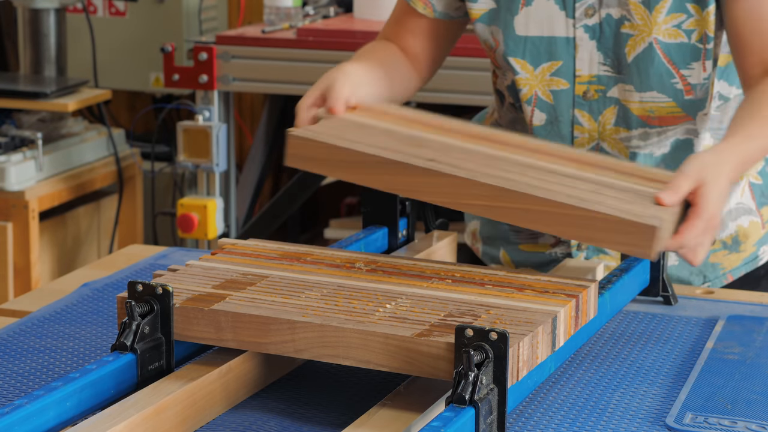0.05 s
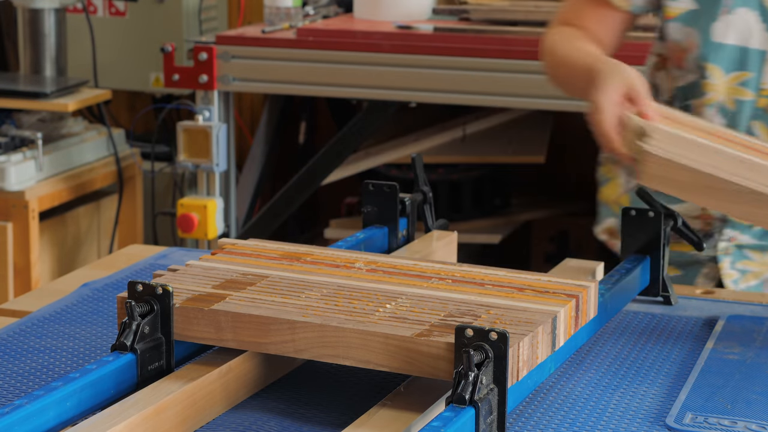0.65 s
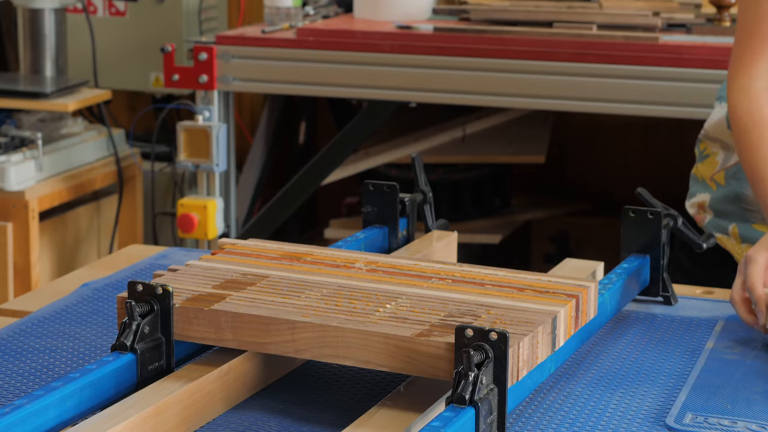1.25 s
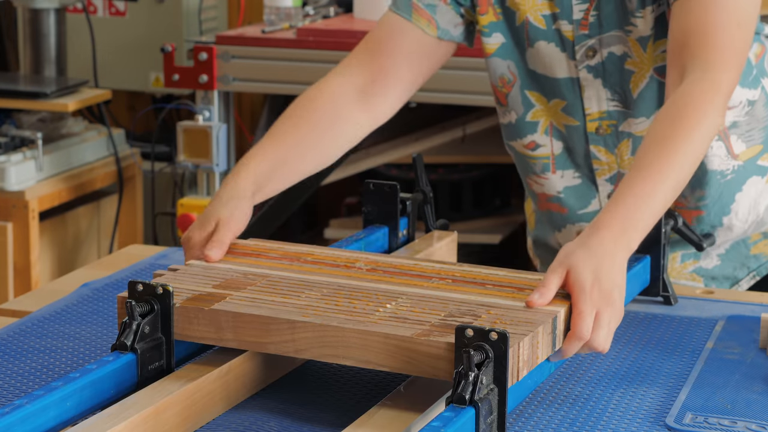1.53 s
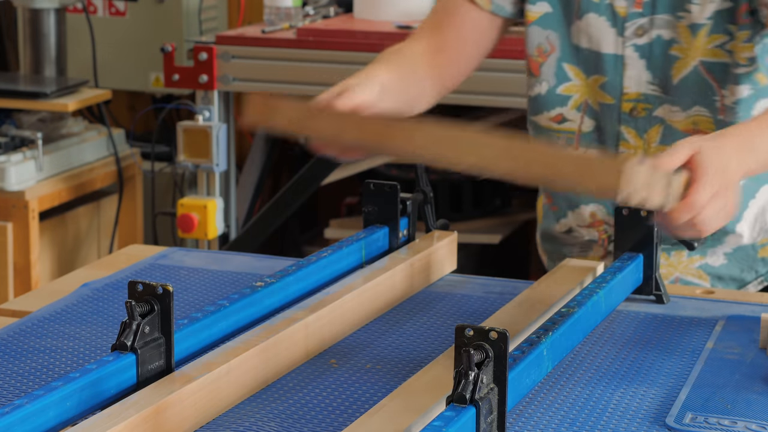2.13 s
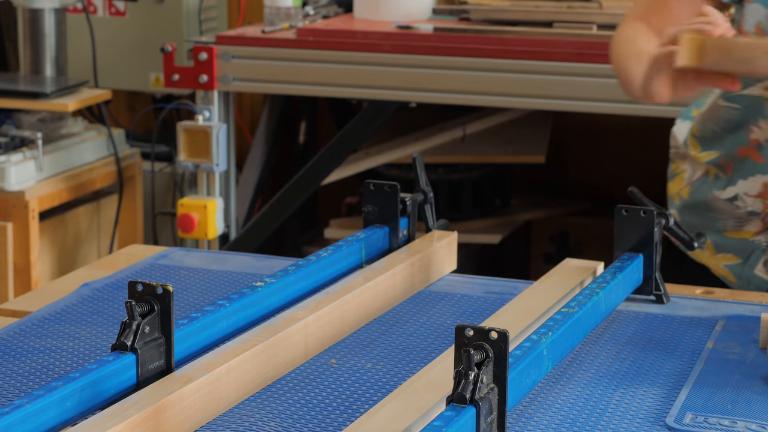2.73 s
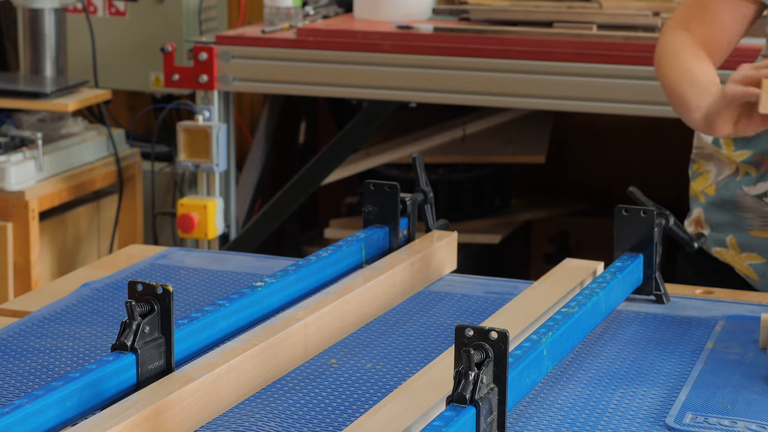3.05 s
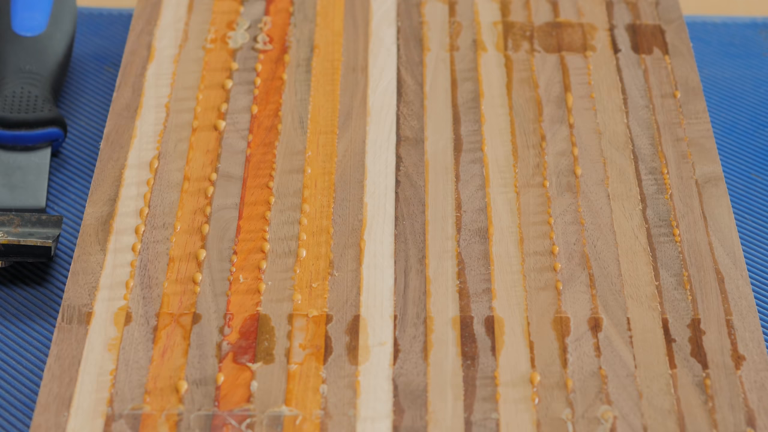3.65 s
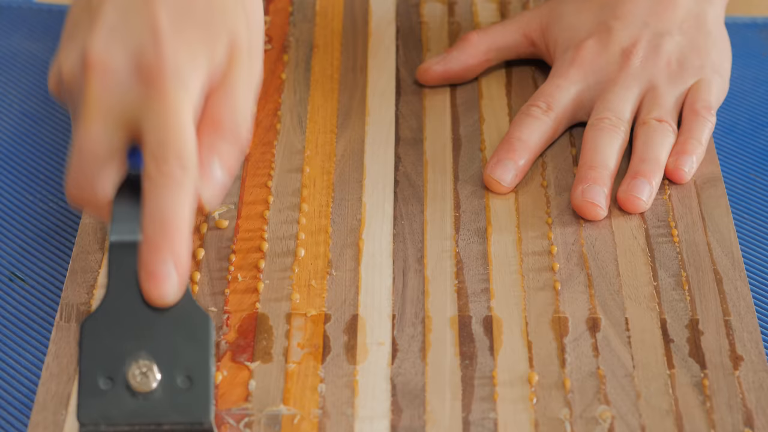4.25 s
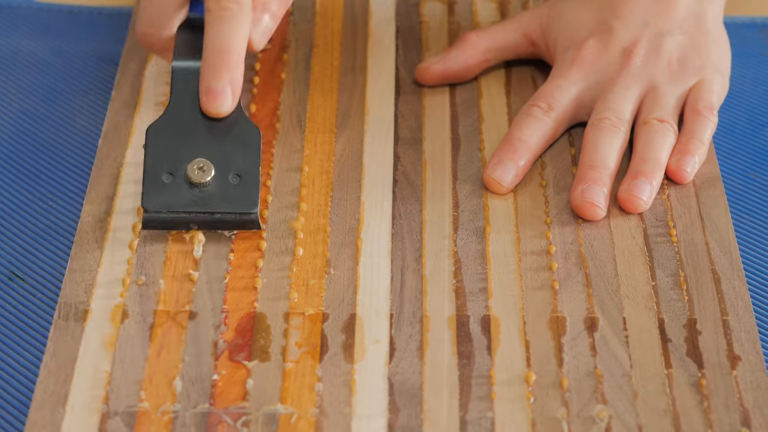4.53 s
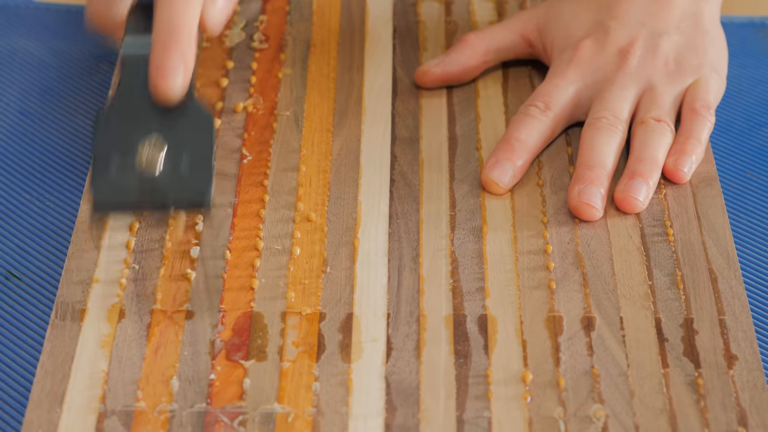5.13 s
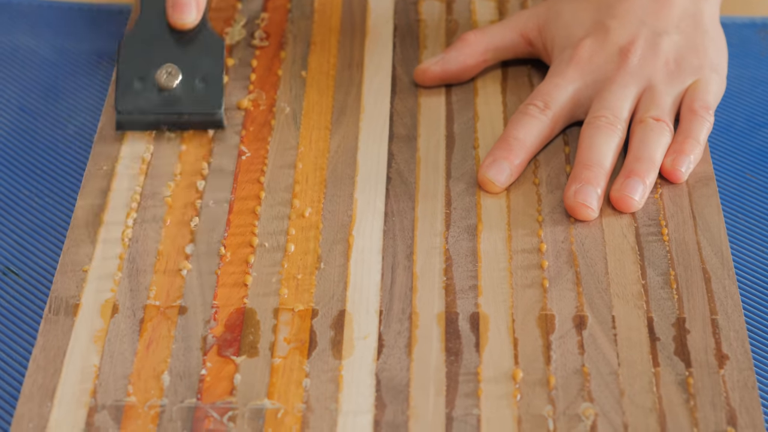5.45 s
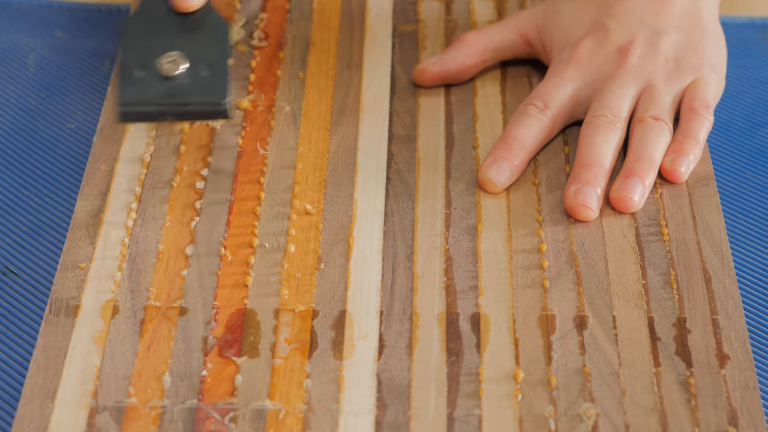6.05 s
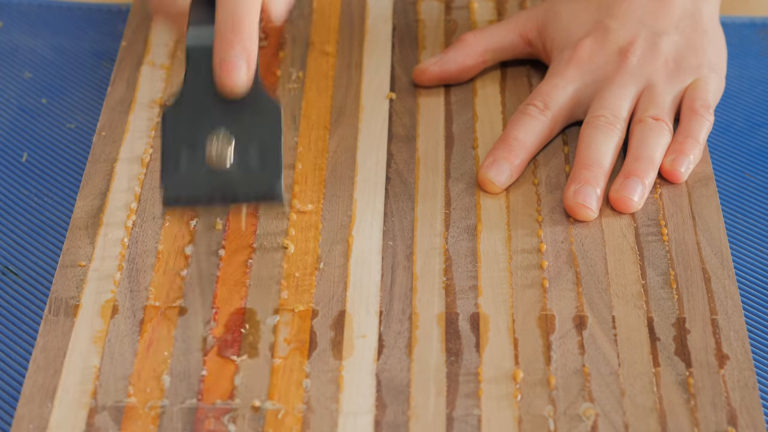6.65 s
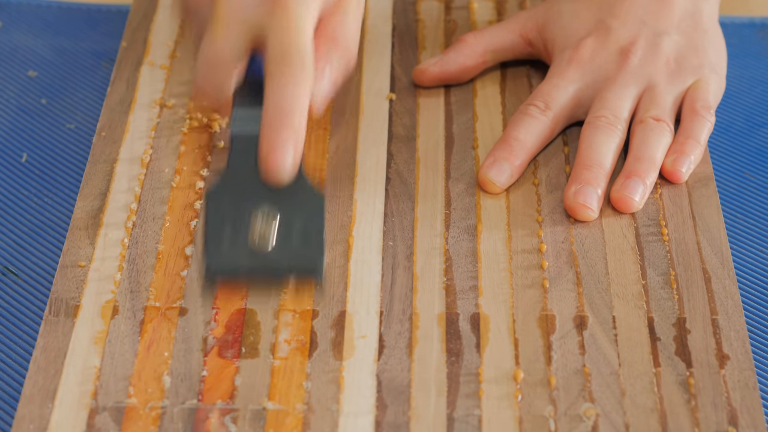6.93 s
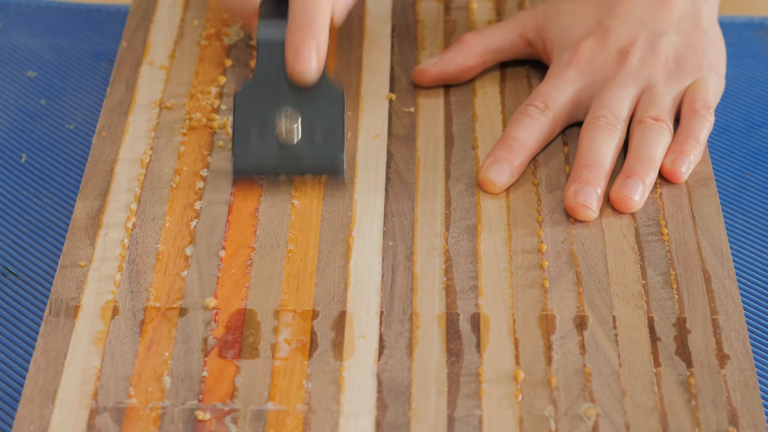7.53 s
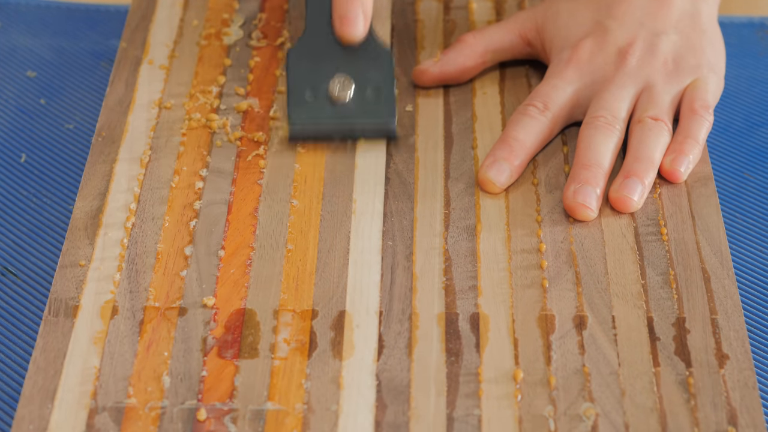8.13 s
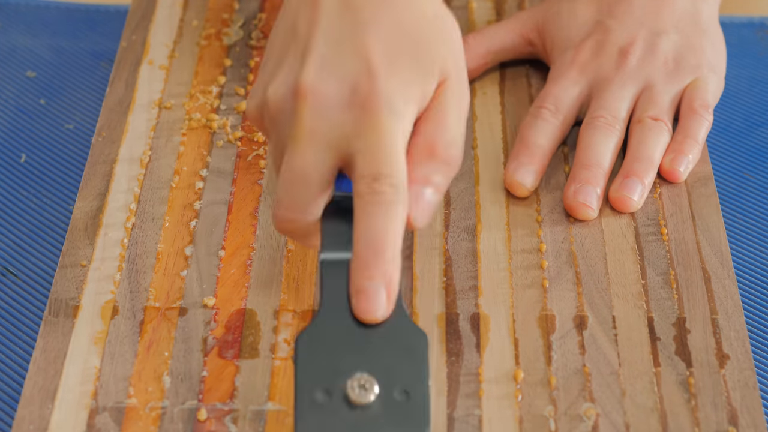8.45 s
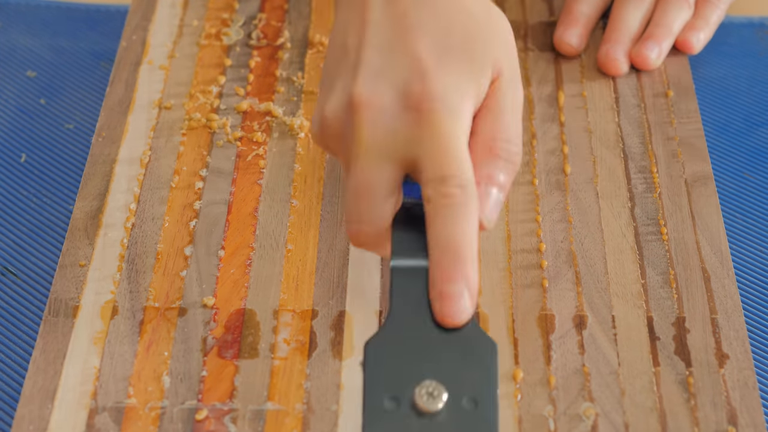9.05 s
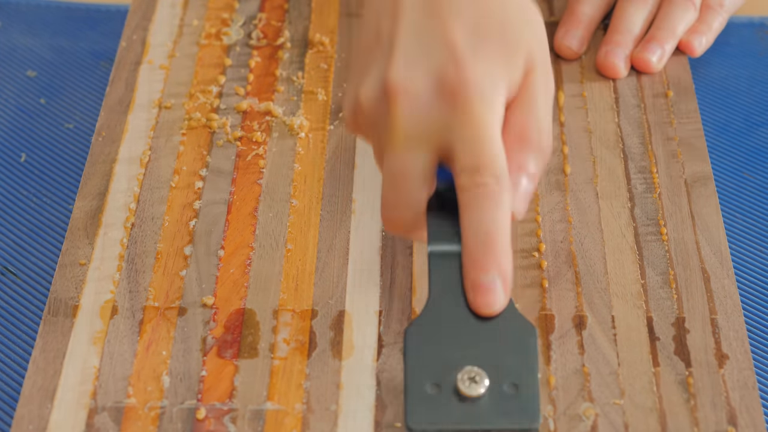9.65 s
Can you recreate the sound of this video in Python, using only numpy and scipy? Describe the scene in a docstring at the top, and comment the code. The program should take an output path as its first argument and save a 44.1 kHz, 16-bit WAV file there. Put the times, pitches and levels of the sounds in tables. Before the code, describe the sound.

In a quiet workshop, a glued wooden board is lifted from its clamps with soft shuffling, a few light knocks and low bumps over a faint machine whine. After about four seconds a steel hand scraper knocks down on the board close to the microphone and makes eleven even pulls. The blade rasps, crackles and chatters, snapping off beads of dried glue, and the strokes grow louder as the wood rings beneath.

```python
"""Light knocks and shuffling over a faint whine: in a workshop a glued-up board is lifted from its clamps.
Then a hand scraper knocks down on it and makes eleven pulls. The steel edge catches and slips in
dried glue, crackling, chattering and snapping off beads; the board rings under it and the bench
rumbles. The loudest peaks overload."""
import sys
import numpy as np
from scipy import signal
from scipy.io import wavfile
from scipy.ndimage import uniform_filter1d

SR = 44100
rng = np.random.default_rng(int(sys.argv[2]) if len(sys.argv) > 2 else 0)


def persist_wave(psi):
    """Save psi, clipped to +-1, as 16-bit WAV."""
    counts = np.round(np.clip(psi, -1, 1) * 32767).astype(np.int16)
    wavfile.write(sys.argv[1], SR, np.atleast_2d(counts).T)


N = 435840
TIME = np.arange(N) / SR


def gain_of(db):
    return np.exp(np.asarray(db) * np.log(10) / 20)


def unit_rms(x):
    return x / np.sqrt(np.mean(x ** 2) + 1e-20)


def unit_energy(x):
    return x / np.linalg.norm(x)


def curve_at(points, hz):
    point_hz, value = np.transpose(points)
    return np.interp(np.log(hz + 1), np.log(point_hz + 1), value)


def add(mix, start_s, sound):
    part = mix[round(start_s * SR):][:len(sound)]
    part += sound[:len(part)]


def through(x, response):
    return signal.oaconvolve(x, response)[:len(x)]


def tone(hz):
    return np.sin(2 * np.pi * np.cumsum(hz) / SR)


def colour(spectrum, peaks=(), size=4096):
    """Causal response of energy 1 from a spectrum (Hz, dB) and peaks (Hz, half-width Hz, dB)."""
    hz = abs(np.fft.fftfreq(size, 1 / SR))
    power = gain_of(curve_at(spectrum, hz)) ** 2
    for centre, width, db in peaks:
        power += (gain_of(db) / (1 + ((hz - centre) / width) ** 2)) ** 2
    log_gain = np.log(power + 1e-10) / 2
    minimum_phase = np.exp(np.conj(signal.hilbert(log_gain)))
    return unit_energy(np.fft.ifft(minimum_phase).real[:size // 2])


def resonate(x, hz, width_hz):
    """A resonance that follows the curve hz; output rms 1."""
    turn = np.exp(2j * np.pi * np.cumsum(hz) / SR)
    r = np.exp(-np.pi * width_hz / SR)
    return unit_rms((turn * signal.lfilter([(1 - r) ** 2], [1, -2 * r, r * r], x / turn)).real)


def puff(rise_s, decay_s, size):
    t = np.arange(size) / SR
    return (1 - np.exp(-(t / rise_s) ** 2)) * np.exp(-t / decay_s)


def burst(rise_s, decay_s, size=4096):
    """A puff of noise, about rms 1 at its top."""
    shape = puff(rise_s, decay_s, size)
    return rng.standard_normal(size) * shape / shape.max()


def swell(t, length_s, rise_s, depth_db, release_db_per_s):
    """Gain that rises, holds until length_s, then dies."""
    db = -depth_db * np.clip(1 - t / rise_s, 0, 1) - release_db_per_s * np.maximum(t - length_s, 0)
    return np.clip(t / .01, 0, 1) * gain_of(db)


def wander(seconds):
    """Smooth random drift of rms 1."""
    return unit_rms(through(rng.standard_normal(N), np.hanning(max(int(seconds * SR), 3))))


def grains(per_s, spread_db):
    """Tiny fractures: random clicks, a few of them large."""
    sizes = gain_of(spread_db * np.minimum(rng.exponential(1, N), 4))
    return unit_rms(sizes * rng.choice([-1., 1.], N) * (rng.random(N) < per_s / SR))


# Room noise and hiss spectra. Each row: frequency in Hz, density in dB.
AIR_SPECTRUM = [(25, -8), (45, 1), (70, -5.5), (200, -4), (400, -9), (700, -15.5), (1200, -19.5),
                (3000, -23.5), (16000, -36)]
HISS_SPECTRUM = [(200, 3.5), (1000, 5), (3000, 8), (6000, 0), (10000, -12), (16000, -32)]


def background(hiss_from_s=3.32, hiss_to_s=4.33, hum_start_s=.56, hum_hz=59.5,
               whine_end_s=3.32, whine_hz=947):
    """Low room noise, a spell of soft hiss, a passing hum and a thin machine whine."""
    spell = uniform_filter1d(1. * ((TIME > hiss_from_s) & (TIME < hiss_to_s)), SR // 50)
    air_db = np.where(TIME < hiss_to_s, -63.5, -65) + 3 * spell + .8 * wander(.2)
    air = gain_of(air_db) * through(rng.standard_normal(N), colour(AIR_SPECTRUM))
    hiss = gain_of(-71) * spell * through(rng.standard_normal(N), colour(HISS_SPECTRUM))
    hum_shape = swell(TIME - hum_start_s, length_s=.6, rise_s=.1, depth_db=18, release_db_per_s=8.1)
    hum = gain_of(-63.5) * hum_shape * unit_rms(tone(hum_hz + 3 * wander(.22)))
    whine = gain_of(-73 + wander(.16)) * unit_rms(tone(whine_hz + 3 * wander(.15)))
    return air + hiss + hum + whine * (TIME < whine_end_s)


# Room decay. Each row: frequency in Hz, T60 in seconds.
ROOM_T60 = [(100, 0.1), (700, 0.14), (2000, 0.16), (5000, 0.16), (10000, 0.26), (16000, 0.024)]


def reverb(x, first_s=.0069, taps_per_s=3000):
    """Sparse workshop reflections, each band dying at its own rate."""
    size = SR // 2
    taps = rng.choice([-1., 1.], size) * (rng.random(size) < taps_per_s / SR) * (TIME[:size] > first_s)
    hz, t, bands = signal.stft(taps, SR, nperseg=256)
    decay = gain_of(-60 * t / curve_at(ROOM_T60, hz)[:, None])
    tail = signal.istft(bands * decay, SR, nperseg=256)[1]
    return through(x, unit_energy(tail))


def squeak(start_s=.061, length_s=.11, level_db=-59, pitch_hz=1400, wobble_hz=45):
    """Wood slips in the hands: a short, unsteady tone."""
    out, size = np.zeros(N), int(length_s * SR)
    hz = pitch_hz + wobble_hz * wander(.0045)[:size]
    add(out, start_s, gain_of(level_db) * np.hanning(size) * tone(hz))
    return out


# Each row: frequency in Hz, density in dB.
SWISH_SPECTRUM = [(88, -44), (150, -11), (232, -0.5), (496, -4.5), (928, -19), (1080, -17), (1840, -21),
                  (5020, -8.5), (5740, -16.5), (14000, -50)]


def swish(start_s=3.315, length_s=.13, level_db=-54.5):
    """One smooth swish of noise."""
    out = np.zeros(N)
    noise = through(rng.standard_normal(SR), colour(SWISH_SPECTRUM))[:int(length_s * SR)]
    add(out, start_s, gain_of(level_db) * noise * signal.windows.tukey(len(noise), .3))
    return out


# Each row: start in seconds, length in seconds, body level in dB, centre in Hz, hiss level in dB.
RUB_EVENTS = [(0.062, 0.1, -63.5, 1170, -65), (0.522, 0.043, -66, 400, -67.5), (0.79, .14, -59.5, 450, -63),
              (0.954, .19, -54.5, 755, -55.5), (1.33, .10, -66, 1010, -69), (1.678, 0.069, -58, 13300, -56),
              (1.812, 0.2, -80, 2300, -71), (2.558, 0.74, -73.5, 1000, -71),
              (2.759, 0.049, -56.5, 970, -69), (2.972, 0.12, -60.5, 640, -65),
              (4.041, 0.036, -70, 700, -55), (8.951, 0.017, -62.5, 1200, -56.5)]


def rubs():
    """Hands, wood and tool brush and slide: a band of grit plus hiss."""
    out = np.zeros(N)
    grit = grains(per_s=2200, spread_db=5)
    hiss = through(grains(per_s=11000, spread_db=5), colour(HISS_SPECTRUM))
    for start_s, length_s, db, hz, hiss_db in RUB_EVENTS:
        span = slice(int(start_s * SR), int((start_s + length_s) * SR))
        band = colour([(100, -22), (16000, -60.5)], [(hz, 200 + .13 * hz, 0)])
        rub = gain_of(db) * unit_rms(through(grit[span], band)) + gain_of(hiss_db) * hiss[span]
        add(out, start_s, rub * signal.windows.tukey(len(rub), .6))
    return out


# Wood knock and bench spectra. Each row: frequency in Hz, density in dB.
KNOCK_SPECTRUM = [(100, -46), (400, -7), (600, 2.5), (1000, 3), (2400, 6.5), (3500, 0.5), (6000, -4),
                  (9000, -12.5), (16000, -25)]
BENCH_SPECTRUM = [(25, -42.5), (55, -8), (90, -2.5), (130, 6), (175, -9.5), (250, -9.5), (450, -12),
                  (700, -34.5), (2000, -75)]
# Clamp bar modes. Each row: frequency in Hz, level in dB, T60 in seconds.
CLAMP_MODES = [(2180, -14, .33), (2570, -8.5, 0.42), (2730, -5, 0.38), (3046, 0, 0.5), (3490, -15, 0.84),
               (4260, -10.5, 0.58), (4398, -14, 0.33), (5830, -7, 0.3)]
# Each row: start in seconds, level in dB, clamp ring in dB relative to the knock.
KNOCK_EVENTS = [(0.297, -65, -0.5), (1.26, -67, -17), (1.588, -58.5, -13), (1.649, -51, -25),
                (1.779, -39.5, -20), (1.801, -48, -23), (1.853, -48, -10.5), (2.151, -80, -4),
                (2.331, -71, -7.5)]
# Each row: start in seconds, level in dB.
BUMP_EVENTS = [(1.397, -21), (3.925, -24.5), (7.908, -29), (8.459, -24.5)]


def knocks(tick_db=-34):
    """Wood knocks ring the clamp bar; soft bumps shake the bench with a faint tick."""
    out, t = np.zeros(N), TIME[:SR]
    wood = colour(KNOCK_SPECTRUM, [(2200, 390, 4), (2700, 100, 3.5)])
    bench = colour(BENCH_SPECTRUM, [(400, 230, -7), (2500, 2800, -29.5)])
    clamp = sum(gain_of(db - 60 * t / t60) * np.sin(2 * np.pi * hz * t) for hz, db, t60 in CLAMP_MODES)
    for start_s, db, ring_db in KNOCK_EVENTS:
        add(out, start_s, gain_of(db) * through(burst(rise_s=.0042, decay_s=.0092), wood))
        add(out, start_s, gain_of(db + ring_db) * clamp)
    for start_s, db in BUMP_EVENTS:
        add(out, start_s, gain_of(db) * bench)
        add(out, start_s, gain_of(db + tick_db) * through(burst(rise_s=.0017, decay_s=.0025), wood))
    return out


# Board resonances. Each row: frequency in Hz, half-width in Hz, level in dB.
BOARD_MODES = [(714, 16, -0.5), (767.3, 25, -1.5), (859, 20, -7), (1063, 39, -1.5), (1131.6, 23, 3.5),
               (1390, 21, -15), (2063, 79, -10.5), (2100, 92, -20), (2630, 80, -16.5)]
# The board between its resonances. Each row: frequency in Hz, level in dB.
BOARD_SPECTRUM = [(100, -38.5), (600, -26.5), (690, -20), (950, -13), (1230, -6.5), (1600, -27.5),
                  (4000, -31), (16000, -58)]


def board(low_db=0, damping=1, scatter_db=2.05):
    """The board's ring; where the blow falls sets each mode's share, above all the lowest."""
    modes = [(hz, width * damping, db + scatter_db * rng.standard_normal() + low_db * (hz < 900))
             for hz, width, db in BOARD_MODES]
    return colour(BOARD_SPECTRUM, modes, size=8192)


# Scraper resonances. Each row: frequency in Hz, half-width in Hz, level in dB.
BLADE_MODES = [(1986, 140, 0), (2590, 49, -8), (3250, 170, -18), (3430, 200, 2), (3580, 250, -4),
               (4270, 74, -0.5), (5330, 22, -11.5), (6150, 150, -8), (8340, 150, -16.5), (11500, 140, -15),
               (12400, 50, -14), (15500, 290, -18)]
# Crackle at the edge. Each row: frequency in Hz, density in dB.
CRACKLE_SPECTRUM = [(60, -33.5), (250, -24.5), (450, -15), (600, -20.5), (1400, -9), (2400, -16.5),
                    (4500, -9), (7000, -21.5), (9500, -27.5), (14000, -27), (16000, -31.5)]


def blade(detune=.016):
    """The scraper's ring, slightly detuned by each new grip."""
    modes = [(hz * (1 + detune * rng.standard_normal()), width, db) for hz, width, db in BLADE_MODES]
    return colour(CRACKLE_SPECTRUM, modes)


# Each row: start in seconds, level in dB.
GRAZE_EVENTS = [(4.631, -35), (6.796, -52.5), (6.886, -44.5), (7.361, -48.5), (7.765, -51.5), (8.876, -47),
                (9.528, -53.5)]


def grazes():
    """Light, dull touches of the blade on the board between pulls."""
    out = np.zeros(N)
    for start_s, db in GRAZE_EVENTS:
        add(out, start_s, gain_of(db) * burst(rise_s=.0049, decay_s=.0093))
    return through(out, board(low_db=-3, damping=2.9))


# Each row: start in seconds, blow in dB, edge click in dB, lift of the low board modes in dB.
LANDING_EVENTS = [(4.3675, -6.5, -25, -18.5), (4.838, -10, -16, -2.5), (5.2959, -22, -30.5, 2.5),
                  (5.803, -24.5, -29.5, 0), (6.3549, -23, -30, 10.5), (7.430, -15.5, -29.5, 5),
                  (7.998, -6, -18.5, 3), (8.537, 3, -16, 0), (9.135, -3, -25.5, 2),
                  (9.7572, -3.5, -25.5, 7)]


def landings(contact_s=.00017, delay_s=.00097):
    """The edge clicks, then the tool's weight rings the board and nudges the bench; hard blows thud."""
    out, t = np.zeros(N), TIME[:256]
    blow = t * np.exp(-2 * t / contact_s)
    steel = colour(CRACKLE_SPECTRUM, [(2300, 1200, -2), (4840, 1800, -10.5)])
    bench = colour(BENCH_SPECTRUM)
    thud = colour([(30, -44.5), (200, -24), (2000, -70.5)], [(232.2, 35, 0)])
    for start_s, db, click_db, low_db in LANDING_EVENTS:
        wood = through(board(low_db, damping=1.6), blow)
        add(out, start_s, gain_of(click_db) * through(burst(rise_s=.0027, decay_s=.0024), steel))
        add(out, start_s + delay_s, gain_of(db) * wood / abs(wood).max())
        add(out, start_s + delay_s, gain_of(-6 + .048 * db) * bench + gain_of(db - 14) * thud)
    return out


def small_beads(per_pull=8, level_db=-26.5, firm_bite_db=-28):
    """Rows like BIG_BEADS, at random along each pull; louder under a harder bite."""
    rows = []
    for start_s, length_s, bite_db, _ in PULL_EVENTS:
        for k in range(per_pull):
            along = (k + 2 + rng.random()) / (per_pull + 1)
            db = level_db + .16 * (bite_db - firm_bite_db) + rng.standard_normal()
            hz = CHATTER_HZ + CHATTER_DRIFT_HZ * rng.standard_normal()
            rows.append((start_s + along * length_s, db, hz))
    return rows


# Big glue beads. Each row: time of the snap in seconds, level in dB, blade chatter in Hz.
BIG_BEADS = [(4.438, -23, 3300), (4.462, -26, 3080), (4.534, -21.5, 2660), (4.555, -22, 2970),
             (4.929, -18.5, 3930), (4.95, -18, 3320), (5.011, -20, 2630), (5.37, -25.5, 3050),
             (5.397, -20.5, 3045), (5.467, -19, 3490), (5.503, -18, 3340), (5.569, -29, 3200),
             (5.901, -21, 3220), (5.918, -21, 2970), (5.981, -20, 3650), (6.029, -16.5, 3338),
             (6.423, -28, 3500), (6.515, -15.5, 3740), (6.552, -15.5, 4100), (6.6, -20.5, 2870),
             (6.952, -16, 3570), (7.082, -14.5, 3380), (7.109, -20, 3620), (7.143, -11, 2810),
             (7.166, -19.5, 2630), (7.59, -11, 3764), (7.687, -24, 3410), (8.06, -15, 3710),
             (8.082, -13.5, 3575), (8.658, -20, 3540), (8.693, -15.5, 3730), (8.821, -25, 3100),
             (9.243, -20.5, 3400), (9.262, -14, 3354), (9.313, -11.5, 2770), (9.441, -16.5, 3350),
             (9.856, -17.5, 3200)]


def bead_snaps(rise_s=.0019, decay_s=.0019, chirp_db=-1, board_db=-7, bench_db=-23):
    """Each bead breaks in milliseconds; the blade chirps, and board and bench get a kick."""
    snaps, t = np.zeros(N), TIME[:600]
    shape = puff(rise_s, decay_s, len(t))
    shape_norm = np.linalg.norm(shape / shape.max())
    peaks = [(2203, 170, 1), (3780, 430, -1), (5400, 1400, -11), (13360, 500, -22.5)]
    steel = colour(CRACKLE_SPECTRUM, peaks)
    for snap_s, db, hz in list(BIG_BEADS) + small_beads():
        crack = unit_rms(through(rng.standard_normal(len(t)), steel))
        phase_drift = .11 * np.cumsum(rng.standard_normal(len(t)))
        chirp = gain_of(chirp_db) * np.sin(2 * np.pi * hz * t + phase_drift)
        add(snaps, snap_s - rise_s, gain_of(db) * shape_norm * unit_energy(shape * (crack + chirp)))
    kicks = abs(snaps) * rng.standard_normal(N)
    wood = gain_of(board_db) * through(kicks, board())
    bench = gain_of(bench_db) * through(kicks, colour(BENCH_SPECTRUM))
    return snaps + wood + bench


def skipping(stall_s=.0063, stall_db=-6, skip_s=.018, skip_db=-9.5):
    """Gain dips: the edge stalls against each big bead, then jumps clear as it breaks."""
    db, t = np.zeros(N), np.arange(-SR // 10, SR // 10) / SR
    distance = t / np.where(t < 0, stall_s, skip_s)
    dips_db = np.where(t < 0, stall_db, skip_db) * distance ** 2 * np.exp(1 - distance ** 2)
    for snap_s, _, _ in BIG_BEADS:
        add(db, snap_s + t[0], dips_db)
    return gain_of(db)


# From the beaded edge to the smoother middle. Each row: time in seconds, lift of the low board
# modes in dB, unevenness in dB, squeal in dB relative to the bite, bench rumble in dB.
BLADE_PATH = [(4.4, -3, 5.5, -19, -44), (6.5, 1, 6, -19, -42.5), (7.6, 2.5, 2, -16.5, -44.5),
              (8.2, 5, 4, -18.5, -52.5), (8.9, 4.5, 3.5, -19, -51.5), (9.3, 6.5, 4.5, -2.5, -51.5)]
# Each row: start in seconds, seconds until it slows, bite of the blade in dB, board drive in dB.
PULL_EVENTS = [(4.373, 0.18, -34.5, -36.5), (4.845, .17, -36, -36.5), (5.319, 0.22, -42.5, -35),
               (5.835, 0.15, -34.5, -29.5), (6.366, .17, -23.5, -28.5), (6.925, 0.17, -23, -26),
               (7.466, 0.17, -23, -28), (8.006, 0.19, -20, -21), (8.55, 0.23, -24.5, -23),
               (9.159, 0.27, -26, -22.5), (9.775, 0.18, -29, -23)]
CHATTER_HZ, CHATTER_DRIFT_HZ = 3510, 322


def scraping(chatter_db=-6, squeal_hz=2713, wood_db=-1.5, full_drag_db=-43.5,
             dig_at_s=.128, dig_width_s=.018, dig_db=5):
    """The edge catches and slips through the glue, shaking blade, board and bench."""
    path_s, *columns = np.transpose(BLADE_PATH)
    low_db, uneven_db, squeal_db, bench_db = (np.interp(TIME, path_s, c) for c in columns)
    catching = gain_of(uneven_db * (wander(.005) + .8 * wander(.035)))
    catching /= np.sqrt(uniform_filter1d(catching ** 2, SR // 25))  # the hand keeps the mean force
    catching *= skipping()
    blows = catching * grains(per_s=5000, spread_db=2.5)
    crackle = catching * grains(per_s=6000, spread_db=3.5)
    bite, rasp, wood = np.zeros((3, N))
    for start_s, length_s, bite_db, drive_db in PULL_EVENTS:
        span = slice(round(start_s * SR), round(start_s * SR) + SR // 2)
        t = TIME[span] - start_s
        dig = gain_of(dig_db * np.exp(-((t - dig_at_s) / dig_width_s) ** 2))  # on reaching full speed
        edge = gain_of(bite_db) * dig * swell(t, length_s, .12, depth_db=20.2, release_db_per_s=394)
        push = gain_of(drive_db) * swell(t, length_s, .13, depth_db=12, release_db_per_s=316)
        bite[span] += edge
        add(rasp, start_s, signal.oaconvolve(edge * crackle[span], blade()))
        add(wood, start_s, signal.oaconvolve(push * blows[span], board(low_db[span][0])))
    chatter_hz = CHATTER_HZ + CHATTER_DRIFT_HZ * wander(.022)  # drifts with the grip on the glue
    flutter = gain_of(3 * wander(.012))
    chatter = gain_of(chatter_db) * resonate(crackle * flutter, chatter_hz, width_hz=440)
    squeal = gain_of(squeal_db) * resonate(crackle, squeal_hz + 110 * wander(.0075), width_hz=190)
    drag = gain_of(bench_db) * np.sqrt(np.minimum(bite / gain_of(full_drag_db), 1))
    bench = through(drag * grains(per_s=700, spread_db=4), colour(BENCH_SPECTRUM))
    return rasp + bite * (chatter + squeal) + gain_of(wood_db) * wood + bench


def scene():
    """Mono mix: the scraper near, the handling farther off with more reverb."""
    near = scraping() + bead_snaps() + landings() + grazes()
    far = knocks() + rubs() + swish() + squeak()
    room = reverb(gain_of(-14) * near + gain_of(-6.5) * far)
    return (near + far + room + background())[None]


def record(dry):
    """Bass cut, peaks flattened against a rounded ceiling, then a band limit."""
    low_hz, high_hz, ceiling = 36, 16000, .41
    heard = signal.sosfilt(signal.butter(3, low_hz, "high", fs=SR, output="sos"), dry)
    clipped = heard / (1 + (heard / ceiling) ** 6) ** (1 / 6)
    lowpass = signal.firwin(255, high_hz, window=("kaiser", 8), fs=SR)
    return signal.oaconvolve(clipped, lowpass[None], "same")


dry = scene()
out = record(dry)
persist_wave(out)
```